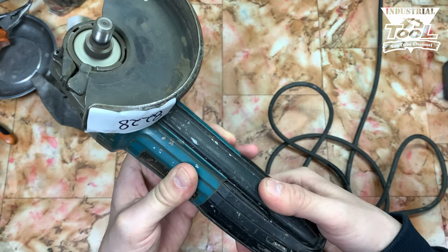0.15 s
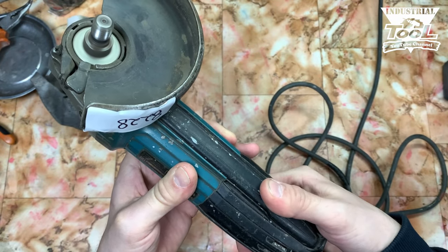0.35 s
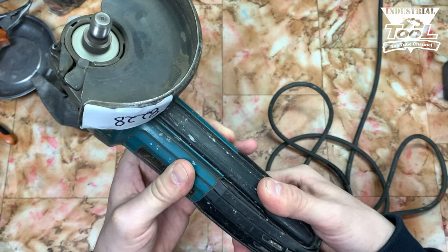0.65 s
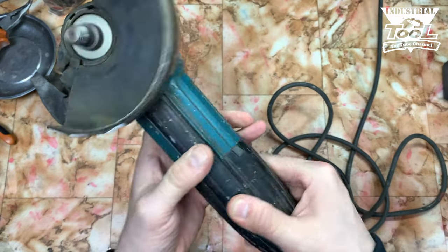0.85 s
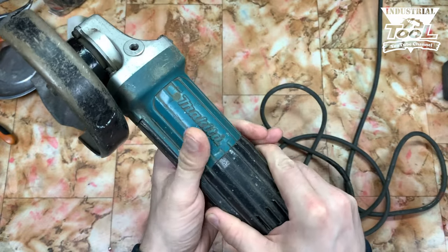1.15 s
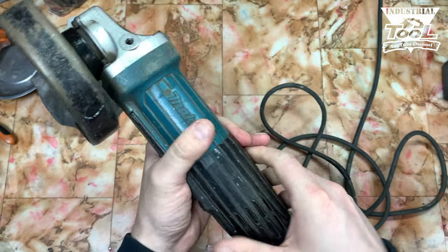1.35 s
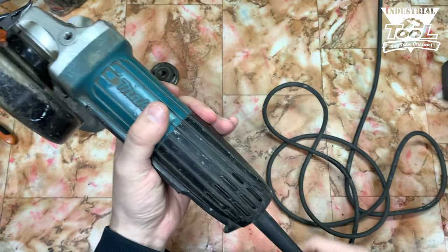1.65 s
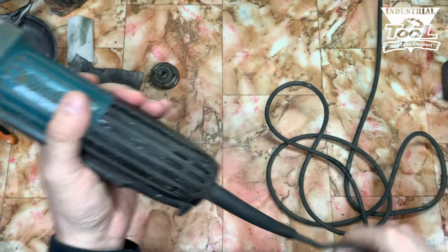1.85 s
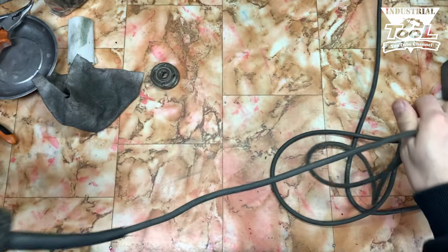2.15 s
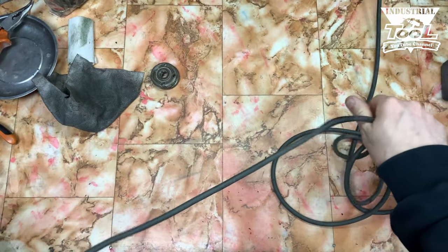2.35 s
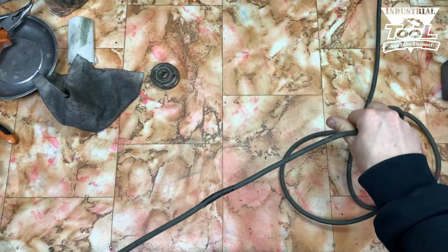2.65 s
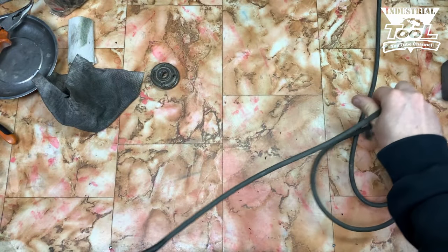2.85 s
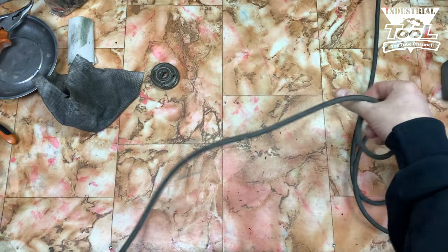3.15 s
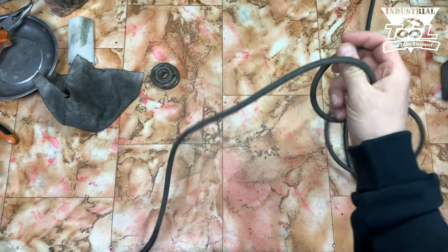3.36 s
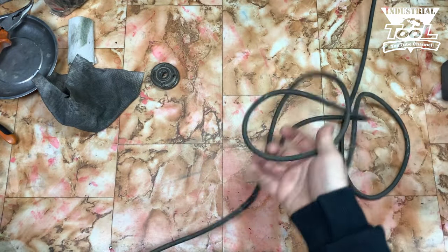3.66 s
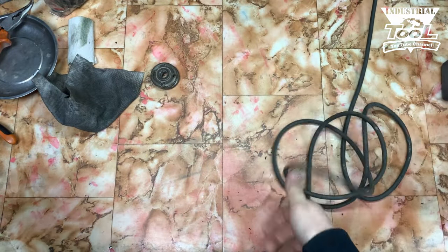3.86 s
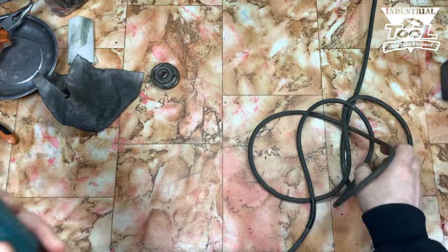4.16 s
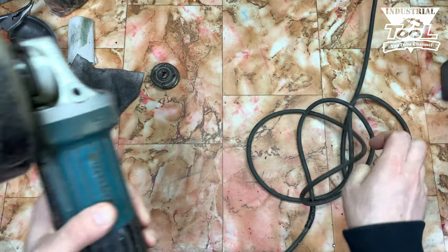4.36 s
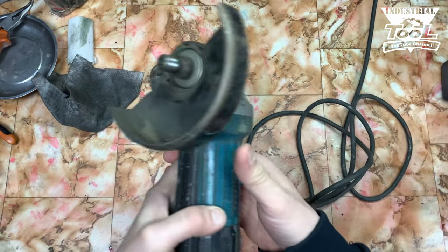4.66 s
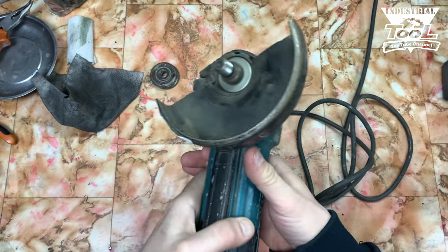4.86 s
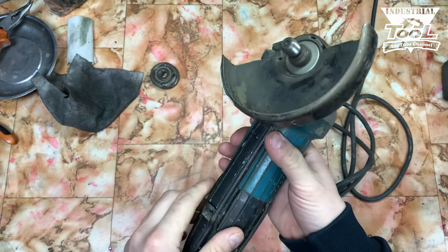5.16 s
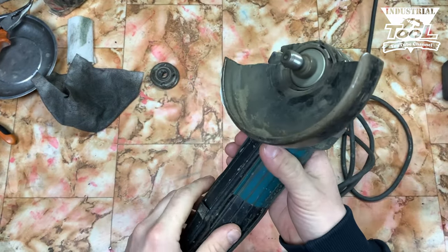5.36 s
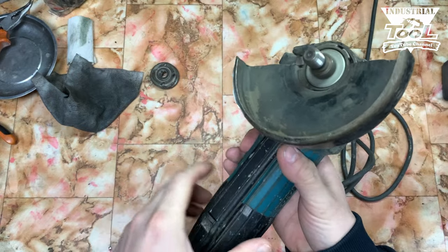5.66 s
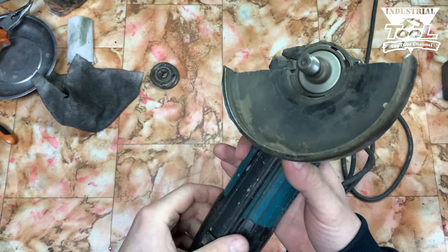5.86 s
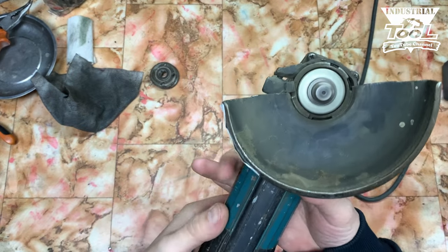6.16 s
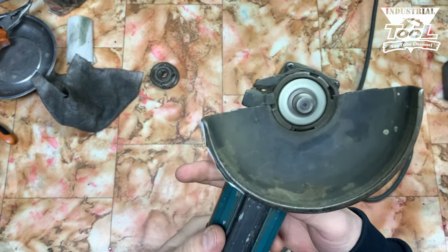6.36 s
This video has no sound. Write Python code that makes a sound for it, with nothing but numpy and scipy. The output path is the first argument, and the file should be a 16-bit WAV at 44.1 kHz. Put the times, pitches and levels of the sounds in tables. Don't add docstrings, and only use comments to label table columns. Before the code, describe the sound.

Bright, hissy rush of a free-running power tool, dimming and returning, then a spin-down ending in dense metallic ticking and a falling thin whine.

```python
import sys
import numpy as np
from scipy import signal
from scipy.fft import rfft, irfft, next_fast_len
from scipy.io import wavfile
from scipy.ndimage import uniform_filter1d, map_coordinates

SR = 44100
rng = np.random.default_rng(int(sys.argv[2]) if len(sys.argv) > 2 else 0)


def decibels_to_gain(level_db):
    exponent = np.asarray(level_db, float) / 20
    return 10 ** exponent


def transcribe(signal):
    frames = np.atleast_2d(signal).T
    limited = np.clip(frames, -1, 1)
    pcm = np.round(limited * 32767).astype(np.int16)
    wavfile.write(sys.argv[1], SR, pcm)


N = 287091
TOP_HZ = 15790

FULL_HZ, SHORT_HZ, RUN_UP_S = 590, 69, .58
OFF_S, DRAG_S, FRICTION_HZ = 4.3876, 2.757, 136.4


def shaft_speed(t):
    running = FULL_HZ - SHORT_HZ * np.exp(-t / RUN_UP_S)
    coasting = (FULL_HZ + FRICTION_HZ) * np.exp(-(t - OFF_S) / DRAG_S) - FRICTION_HZ
    return np.where(t < OFF_S, running, coasting)


# t/s, nearness/dB, housing turned to the ports/0-1, carried aside/0-1
HELD = [(0, -3, 1, 0.23), (.3, -2.5, 0.8, 0.53), (.9, -1, 0.52, 0.44), (1.4, -1.5, 0.66, 0.04),
        (1.95, -2, 0.47, 0.42), (2.3, -5, 0.36, 0.99), (2.6, -9, 0.37, 1), (2.93, -10.5, 0.28, 1),
        (3.3, -8.5, 0.36, 1), (3.6, -5.5, 0.66, 0.98), (3.9, -0.3, 0.06, 0.97), (4.15, 0.5, 0, 0.78),
        (4.42, -0.35, 0.15, 0.2), (4.65, -5.5, 0.75, 0.47), (5, -7.5, 1, 0.4), (5.5, -9, 0.5, 0.1),
        (6, -8.5, 0.65, 0.36), (6.51, -11, 0.94, 0.36)]


def level(law, t):
    near_db, turned, _ = curves(HELD, t)
    base_db, per_near_db, turned_db, octave_db = law
    octaves = np.log2(shaft_speed(t) / FULL_HZ)
    return base_db + per_near_db * near_db + turned_db * turned + octave_db * octaves


def carried_aside(t):
    return np.clip(curves(HELD, t)[2], 0, 1)


# f/Hz, level/dB per Hz
AIR_COLOUR = [(25, -61), (60, -36), (150, -30.5), (270, -23), (600, -15), (1000, -9), (2000, -2), (5000, 1),
              (9000, -2), (12000, -6), (13000, -2.5), (16000, -7.5)]
# f/Hz, width/Hz, then lift/dB when near, held away, coasting
HOUSING = [(260, 9.8, 9, 3.5, 9), (960, 80, 2.5, 5, -1), (1230, 170, 4.5, -1, 0),
           (1880, 250, -1, -2.5, -1.5), (3870, 95, 4, -6, 0), (9970, 1400, -1, 3, 0.5),
           (1605, 510, 5, 0.5, 0.5), (2570, 800, 9, -2, -2.5), (3580, 36, 7, 4, 4.5),
           (3495, 46, -2, -15, -1), (1044, 51, 6.5, -9.5, -5.5), (184, 41, 0.5, -5, 2),
           (660, 32, -15, 0.5, -10), (4470, 350, 7.5, -1, -4.5), (5670, 560, 5, 4.5, 0),
           (4880, 300, -4, 1.5, -4), (12200, 390, 4, 3.5, 10), (15500, 500, 7, -5, 1),
           (7400, 710, 5, -5, 3), (7970, 850, -0.5, 5, 1.5), (11100, 590, 5.5, -5.5, -4)]
# t/s, half length/s, f/Hz, width/Hz, level/dB
BEAMS = [(0.28, 0.24, 3030, 580, -4.5), (0.83, 0.11, 1550, 210, 5.5), (0.78, 0.22, 8100, 1200, 3),
         (1.9, 0.21, 1950, 250, -2.5), (2.34, 0.22, 2080, 120, 8.5), (2.6, .15, 2700, 150, 3.5),
         (3.05, 0.67, 1020, 71, 11.5), (2.15, 0.45, 870, 50, 4), (2.9, 0.6, 190, 60, -10),
         (2.94, 0.38, 450, 85, -6), (1.9, 0.24, 1500, 91, -5), (4.5, .15, 1450, 130, 0.5),
         (5.2, 0.22, 180, 90, -5), (0.25, 0.12, 4000, 500, -3), (4.93, .07, 15400, 600, -15),
         (6.05, .45, 10850, 250, 3), (.1, 0.21, 8500, 1200, 1.5), (2.9, 0.091, 1400, 300, -4),
         (3.08, 0.13, 2430, 130, 7), (3, 0.19, 3550, 35, 2), (3.49, 0.16, 914, 59, 9),
         (3.8, 0.35, 2730, 400, 6), (4.08, 0.18, 5900, 600, 6), (3.55, 0.14, 1060, 250, -4.5),
         (5.1, .3, 200, 93, -7), (6.5, .3, 980, 99, -15), (6.22, 0.27, 2130, 140, 7),
         (5.51, 0.25, 1165, 89, 11), (5.8, 0.28, 1820, 64, 6), (6.1, .5, 8700, 350, 5),
         (5.2, 0.28, 590, 69, -10), (1.59, 0.31, 210, 88, -8)]
BANDS_HZ = [150, 900, 4500, 11800, 15800]
# (dB near at full speed, dB per dB of nearness, dB turned, dB per speed octave)
BODY, VENTS, HISS, FIZZ = (-54.5, 0.66, 6, 3.5), (-37, 0.91, 3, 1.5), (-29.5, 1.18, 1.46, 8.5), (-35, 1.02, -3.5, 7)
BRUSH_S, BRUSH_LONG_S, BRUSH_DB = 4.1, 0.025, 1


def cooling_air():
    hz, t, z = signal.stft(rng.standard_normal((2, N)), SR, nperseg=1024)
    shape, f = z.shape[1:], hz[:, None]
    aside = carried_aside(t)
    coasting = np.clip((520 - shaft_speed(t)) / 150, 0, 1)

    field_db = along(AIR_COLOUR, hz)[:, None]
    for centre, width, near, away, slow in HOUSING:
        lift_db = near + aside * (away - near) + coasting * (slow - near)
        field_db = field_db + np.exp(-((f - centre) / width) ** 2) * lift_db
    field_db += 1.22 * patches(shape, bins=8, frames=25)
    field_db += 0.62 * patches(shape, bins=60, frames=1)
    field_db += 2.54 * patches(shape, bins=1, frames=9)
    for at, half, centre, width, db in BEAMS:
        field_db += db * np.exp(-((f - centre) / width) ** 2 - ((t - at) / half) ** 2)

    power = decibels_to_gain(2 * field_db) / len(hz)
    edges = np.searchsorted(hz, BANDS_HZ)
    missing_db = []
    for law, a, b in zip([BODY, VENTS, HISS, FIZZ], edges, edges[1:]):
        missing_db.append(level(law, t) - 10 * np.log10(power[a:b].sum(0)))
    missing_db = uniform_filter1d(np.array(missing_db), size=12, axis=1)
    centres = np.log([500, 2200, 7500, 13500])
    share = [np.interp(np.log(hz + 1), centres, row) for row in np.eye(4)]
    gain_db = field_db + np.transpose(share) @ missing_db
    gain_db += BRUSH_DB * np.exp(-((t - BRUSH_S) / BRUSH_LONG_S) ** 2)
    return signal.istft(z * decibels_to_gain(gain_db), SR, nperseg=1024)[1][:, :N]


def shaft_tone(turns, order, blur):
    return np.sqrt(2) * np.sin(2 * np.pi * order * turns + blur * wobble(40))


# f/Hz, level/dB
WHINE = [(6200, -60), (6550, -53), (7000, -57), (7400, -54), (7800, -47), (8300, -50), (8800, -54),
         (9200, -50), (9800, -52), (10300, -50), (11000, -51), (11600, -46.5), (12900, -45), (13600, -47),
         (14200, -44), (14800, -38), (15600, -49)]
# t/s, half length/s, depth/dB
SHADED = [
    (5.55, 0.014, 4),
    (5.63, .012, 11),
    (5.705, .015, 9),
    (5.9, 0.023, 0),
    (5.975, 0.015, 13),
    (6.04, 0.012, 14),
    (6.225, 0.021, 12),
    (6.295, .012, 10),
    (6.49, .03, 5),
]
BLADES = 31


def fan_whine(t, turns):
    hz = BLADES * shaft_speed(t)
    heard = hz < TOP_HZ
    flutter = decibels_to_gain(1.6 * wobble(70) + .5 - bells(SHADED, t))
    return heard * flutter * decibels_to_gain(along(WHINE, hz)) * shaft_tone(turns, order=BLADES, blur=0.43)


# multiple of shaft speed, level/dB under the vents
ORDERS_DB = [(5, -21), (6, -24), (10, -26), (12, -23), (13, -27), (24, -27), (26, -28)]


def slots_and_teeth(t, turns):
    lines = sum(decibels_to_gain(db + 3 * wobble(8)) * shaft_tone(turns, order=k, blur=0.99) for k, db in ORDERS_DB)
    return decibels_to_gain(level(VENTS, t)) * lines


# t/s, half length/s, depth/dB
DAMPED = [(.15, .15, -4), (.55, .25, 12), (1.25, .5, 5), (1.78, .1, 8), (2.15, .3, 4), (2.85, .5, 11),
          (3.6, .2, 4.5), (4.55, .04, 12), (4.75, .15, -3), (5.47, .13, 3), (5.82, .13, 5), (6.42, .12, 5)]
SHAKE_LAW = (-58.5, 0.5, 1.5, 3)


def unbalance(t, turns):
    shake_db = level(SHAKE_LAW, t) - bells(DAMPED, t) + 1.2 * wobble(16)
    return decibels_to_gain(shake_db) * shaft_tone(turns, order=1, blur=0.35)


# f/Hz, width/Hz, level/dB
GEARCASE = [(1170, 35, -14), (1745, 200, -6), (3724, 110, 1.5), (5720, 750, -8), (8150, 300, 1),
            (9050, 250, 2.5), (10850, 260, 6.5)]


def case_ring(modes):
    def response(f):
        total = 0
        for k, (centre, width, db) in enumerate(modes):
            damping = 1j * f * width
            total = total + (-1) ** k * decibels_to_gain(db) * damping / (centre ** 2 - f ** 2 + damping)
        return total / (1 + (f / 12200) ** 12)
    return response


RATTLE_LAW = (-40, 1.76, 6, 0)


def gear_rattle(t, turns):
    due = np.flatnonzero(np.diff(np.floor(turns * .45)))
    late, strength, side = rng.random((3, len(due)))
    at = np.minimum(due + (150 * late).astype(int), N - 1)
    ticks = np.zeros(N)
    ticks[at] = decibels_to_gain(-2.4 * np.log(strength + 0.074)) * np.sign(side - .5)
    ticks *= decibels_to_gain(3.3 * wobble(25))
    scrape = decibels_to_gain(-60 * t[:200] / 0.0073) * rng.standard_normal(200)
    rung = filtered(np.convolve(ticks, scrape)[:N], case_ring(GEARCASE))
    return decibels_to_gain(level(RATTLE_LAW, t)) * unit(rung)


# t/s, peak level/dB, low ring level/dB
KNOCKS = [(5.4866, -35, 7.5), (5.506, -34, 1), (5.5191, -44, 0), (5.5573, -34, 1), (5.6149, -33.5, 2),
          (5.636, -36, 1), (5.6599, -37, -5), (5.6745, -47, -8), (5.6931, -40, -17), (5.6981, -39, 8),
          (5.7254, -41, -8), (5.8187, -32, 4), (5.8254, -37, -6), (5.8353, -39, 4), (5.8824, -41, 3),
          (5.906, -34, 0), (5.9346, -38, 2), (5.9753, -36, -5), (5.986, -36, -7), (5.99, -34, -5),
          (6.0305, -38, 4), (6.0457, -35, 7), (6.0522, -37, 6), (6.0606, -35.5, 12), (6.0758, -36, 1),
          (6.0832, -34, 2), (6.0971, -32, 7), (6.1439, -33, 3), (6.1808, -36, 8), (6.1855, -30, -11),
          (6.2111, -38, 12.5), (6.2159, -38, 9), (6.2407, -32, 4), (6.2507, -30.5, -1),
          (6.2546, -32.5, 6.5), (6.2623, -44, 1), (6.2746, -35, 5), (6.2819, -31, 1), (6.2909, -44, 5),
          (6.3078, -29.5, 6), (6.3122, -37, -3), (6.3222, -41, -8), (6.3301, -31, -8), (6.3342, -46, 6),
          (6.3398, -51, 5), (6.3613, -39, 1), (6.3654, -30.5, 3), (6.3726, -42, 5), (6.3902, -44, 2),
          (6.3999, -31.5, 2), (6.4059, -41, 1), (6.4231, -47, 9), (6.4273, -36, 4), (6.4433, -34, 7),
          (6.4514, -31.5, 0), (6.462, -32, -5), (6.4717, -39, -9), (6.4763, -51, 10), (6.4815, -36.5, 8),
          (6.4953, -37, 3)]
SLACK_S, SLACK_TURNS, SLACK_DB, SLACK_SPREAD_DB = 4.2, 6.9, -48, 7


def backlash_knocks(t, turns):
    waiting = (t[1:] > SLACK_S) * (t[1:] < KNOCKS[0][0])
    slack = np.flatnonzero(np.diff(np.floor(turns / SLACK_TURNS)) * waiting)
    luck = rng.random((3, len(slack))) - .5
    at = np.minimum(slack / SR + .012 * luck[0], t[-1])
    light = np.c_[at, SLACK_DB + SLACK_SPREAD_DB * luck[1], 8 * luck[2]]
    high, low = np.zeros((2, N + 300))
    for s, db, low_db in [*KNOCKS, *light]:
        scrape = decibels_to_gain(-60 * t[:300] / 0.0039) * rng.standard_normal(300)
        blow = decibels_to_gain(db) * unit(t[:300] * scrape)
        start = round(s * SR)
        high[start:start + 300] += decibels_to_gain(-.8) * blow
        low[start:start + 300] += decibels_to_gain(low_db + .5) * blow
    return filtered(high, case_ring(GEARCASE[3:])) + filtered(low, case_ring(GEARCASE[:3]))


# t/s, f/Hz, level/dB
GRIP = [
    (4.9, 100, -85),
    (4.915, 125, -68),
    (4.94, 205, -65),
    (4.965, 250, -59),
    (4.99, 220, -64),
    (5.015, 165, -65),
    (5.04, 140, -88),
]


def palm_rub(t):
    hz, db = curves(GRIP, t)
    phase = 2 * np.pi * np.cumsum(hz) / SR
    rub = decibels_to_gain(db + 2 * wobble(90)) * np.sqrt(2) * np.sin(phase + .7 * wobble(110))
    rub += decibels_to_gain(db - 7 + 2 * wobble(90)) * np.sqrt(2) * np.sin(.7 * phase + 1.2 * wobble(110))
    return rub


# t/s, peak level/dB, f/Hz
BUMPS = [
    (3.065, -66, 260),
    (3.355, -70, 110),
    (3.455, -67, 95),
    (3.45, -60, 400),
    (3.695, -67, 105),
    (3.752, -54, 930),
    (3.765, -50, 340),
    (3.775, -71, 80),
    (3.94, -71, 127),
]


def handling_bumps(t):
    thud, u = np.zeros(N), t[:3000]
    for s, db, hz in BUMPS:
        start = round(s * SR)
        onset = 1 - np.exp(-u * hz * 3)
        thud[start:start + 3000] += decibels_to_gain(db + 11.5 - 60 * u * hz / 9) * onset * np.sin(2 * np.pi * hz * u)
    return thud


# f/Hz, lead/radians
LEAD = [(0, 0), (1000, .3), (1800, .15), (2500, 1.4), (3150, 1.8), (3900, 1.4), (4480, 2.0), (4900, 3.08),
        (5600, 3.2), (6200, 4.45), (7600, 6.15), (9600, 6.6), (10700, 8.3), (11250, 9.25), (12300, 9.4),
        (13100, 9.55), (13800, 10.0), (14750, 12.0), (15300, 12.5), (16000, 12.56)]
# f/Hz, lead/radians
LEAD_ASIDE = [(300, 0), (1300, .8), (2300, 0), (3400, 0), (4480, .7), (4900, .05), (5500, .6), (6500, .2),
              (7500, 0)]
# f/Hz, lead/radians
LEAD_SLOW = [(3500, 0), (4400, -.5), (4900, 0), (6500, .1), (7200, -.3), (8000, 0), (10200, .2),
             (11000, -.7), (11900, 0)]
# f/Hz, likeness/0-1
ALIKE = [(60, .98), (300, .97), (550, .88), (850, .68), (1600, .85), (2400, .66), (3500, .5), (4550, .7),
         (4900, .97), (5300, 1), (5600, .98), (6100, .74), (7000, .74), (7900, 1), (9200, .98), (9900, .68),
         (11000, .76), (11600, .99), (13300, .95), (14400, .5), (15400, 1)]
# f/Hz, level/dB
LEFT_DB = [(60, -2), (120, 0), (240, -3.5), (480, -3), (950, -2.5), (1890, -2.5), (3770, -1.5), (7520, 1),
           (15000, -1)]
# t/s, half length/s, share/0-1
GLANCE = [(.12, .03, .2), (.3, .1, .1), (.68, .06, .22), (1.68, .04, .15), (.97, .03, .15),
          (1.27, .04, .12), (4.85, .03, .3), (5.2, .07, .15), (6.15, .03, .2), (6.235, .018, .35),
          (6.305, .014, .35), (6.445, .014, .3)]
SIDES = np.array([[.5], [-.5]])


def led(x, lead):
    return filtered(x, lambda hz: np.exp(1j * SIDES * np.interp(hz, *np.transpose(lead))))


def ports(direct, diffuse, t):
    aside = carried_aside(t)
    turn = lambda hz: np.arccos(np.clip(along(ALIKE, hz), 0, 1)) / 2
    hump = lambda hz, centre, width: np.exp(-((hz - centre) / width) ** 4)
    common = filtered(direct, lambda hz: np.cos(turn(hz)))
    apart = filtered(diffuse, lambda hz: np.sin(turn(hz)))
    apart += 0.45 * aside ** 45 * filtered(diffuse, lambda hz: hump(hz, 3700, 2100))
    glance = bells(GLANCE, t) + .035 * decibels_to_gain(5 * wobble(20))
    apart += glance * filtered(diffuse, lambda hz: hump(hz, 5200, 700) + .7 * hump(hz, 11900, 600))

    pair = np.array([common + apart, common - apart])
    near = led(filtered(pair, lambda hz: decibels_to_gain(SIDES * along(LEFT_DB, hz))), LEAD)
    held = near + aside ** 2 * (led(near, LEAD_ASIDE) - near)
    coasting = np.clip((450 - shaft_speed(t)) / 100, 0, 1)
    return held + coasting * (led(near, LEAD_SLOW) - held)


def vent_ports(whine):
    lead_s = 121e-6 * np.array([[1], [-1]])
    return filtered(whine, lambda hz: np.exp(1j * np.pi * hz * lead_s))


def room(x, t60=0.06):
    count = SR // 3
    tail = rng.standard_normal(count) * decibels_to_gain(-60 * np.arange(count) / SR / t60)
    return signal.fftconvolve(x, tail / np.linalg.norm(tail))[:N]


# f/Hz, share level/dB
MAINS = [(60, -2), (100, -12)]
HUM_LAW = (-75.5, 0, 0.5, -3)
HUM_OFF_DB, HUM_FADE_S = -13, 0.37


def mains_hum(t):
    hum = 0
    for hz, db in MAINS:
        hum = hum + decibels_to_gain(db + 3.0 * wobble(5.1)) * np.sin(2 * np.pi * hz * t + 1.6 * wobble(7.9))
    return hum * decibels_to_gain(level(HUM_LAW, t) + HUM_OFF_DB * np.clip((t - OFF_S) / HUM_FADE_S, 0, 1))


def along(points, hz):
    f, v = np.transpose(points)
    return np.interp(np.log(hz + 1), np.log(f + 1), v)


def curves(rows, t):
    at, *columns = np.transpose(rows)
    return [np.interp(t, at, column) for column in columns]


def bells(rows, t):
    return sum(height * np.exp(-((t - s) / half) ** 2) for s, half, height in rows)


def unit(x):
    return x / np.sqrt(np.mean(x ** 2) + 1e-20)


def wobble(rate):
    at = np.arange(0, N + 32, 32)
    knots = rng.standard_normal(int(N * rate / SR) + 4)
    return np.interp(np.arange(N), at, map_coordinates(knots, [at * rate / SR]))


def filtered(x, response):
    m = next_fast_len(N + 4096)
    return irfft(rfft(x, m) * response(np.fft.rfftfreq(m, 1 / SR)), m)[..., :N]


def patches(shape, bins, frames):
    field = rng.standard_normal(shape)
    for _ in range(2):
        field = uniform_filter1d(uniform_filter1d(field, bins, 0), frames, 1)
    return unit(field)


def scene():
    t = np.arange(N) / SR
    turns = np.cumsum(shaft_speed(t)) / SR
    roar, other_roar = cooling_air()
    whine = fan_whine(t, turns)
    lines = slots_and_teeth(t, turns) + unbalance(t, turns)
    clatter = gear_rattle(t, turns) + backlash_knocks(t, turns)[:N] + palm_rub(t) + handling_bumps(t)
    echo = room(clatter + .4 * (lines + whine))
    direct = roar + lines + clatter + decibels_to_gain(-6.0) * echo
    return ports(direct, other_roar + echo, t) + vent_ports(whine) + mains_hum(t)


def band_limit(x):
    return signal.sosfilt(signal.butter(12, 17070, fs=SR, output="sos"), x)


def record(dry):
    mix = filtered(dry, lambda hz: hz < TOP_HZ)
    return band_limit(mix)


dry = scene()
out = record(dry)
transcribe(out)
```